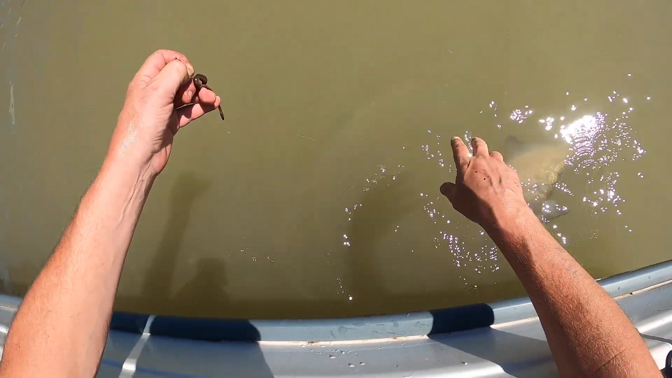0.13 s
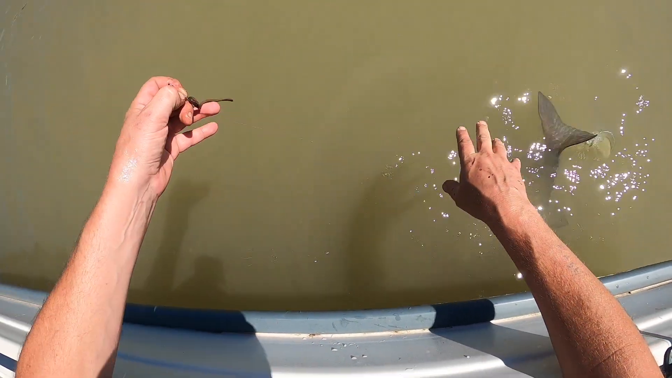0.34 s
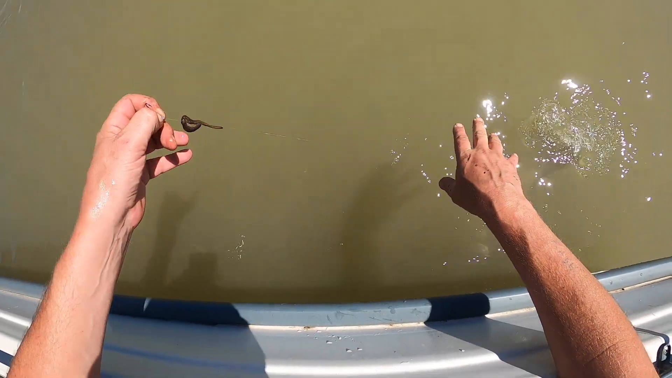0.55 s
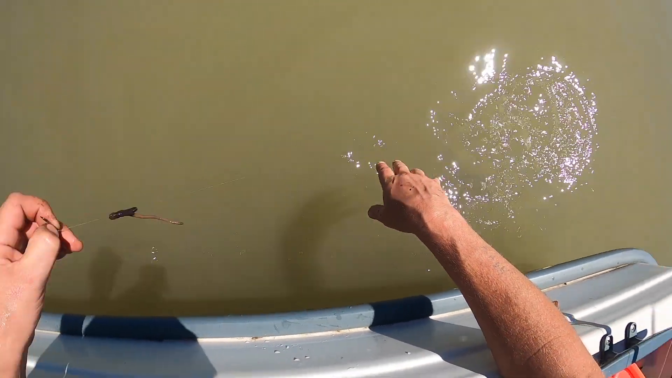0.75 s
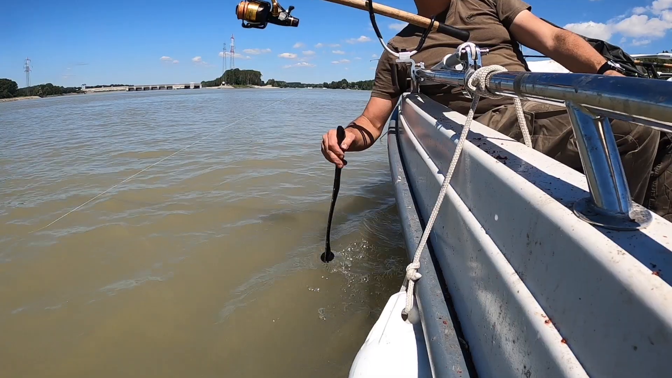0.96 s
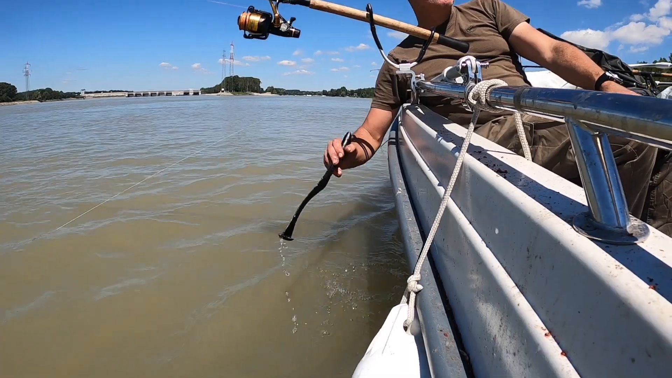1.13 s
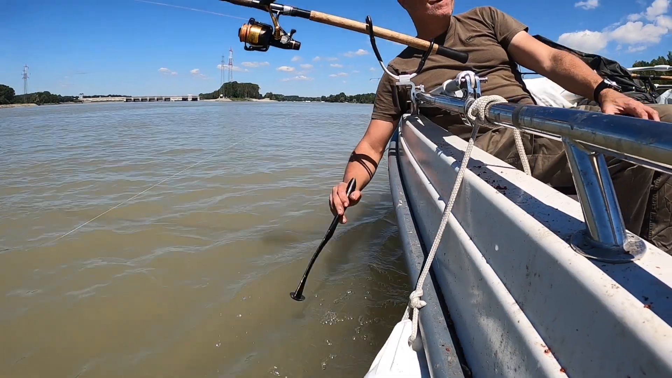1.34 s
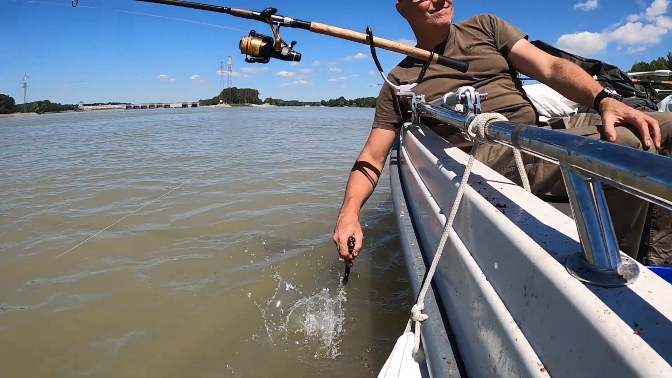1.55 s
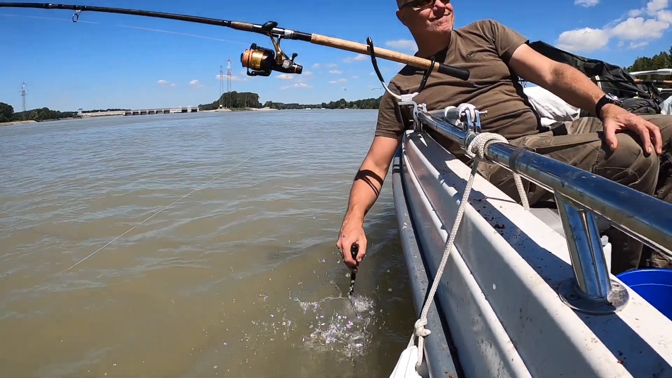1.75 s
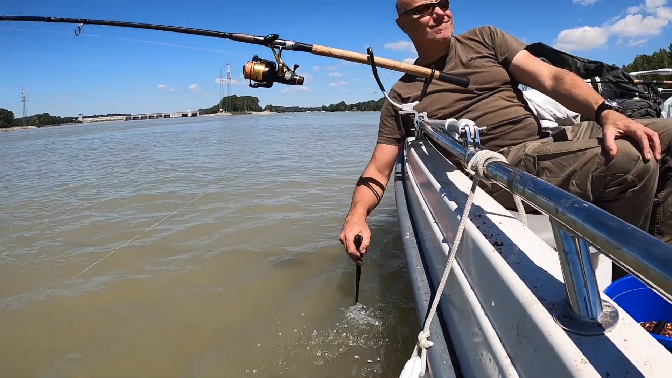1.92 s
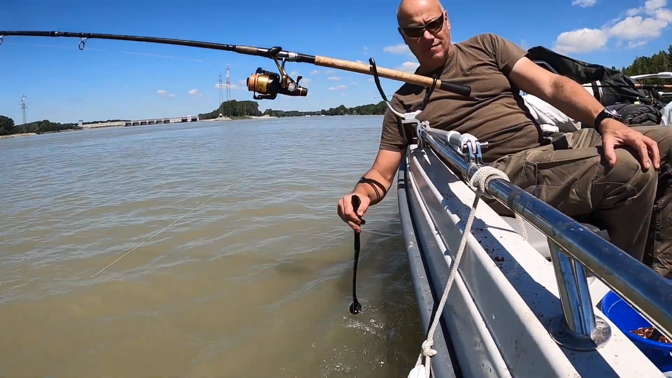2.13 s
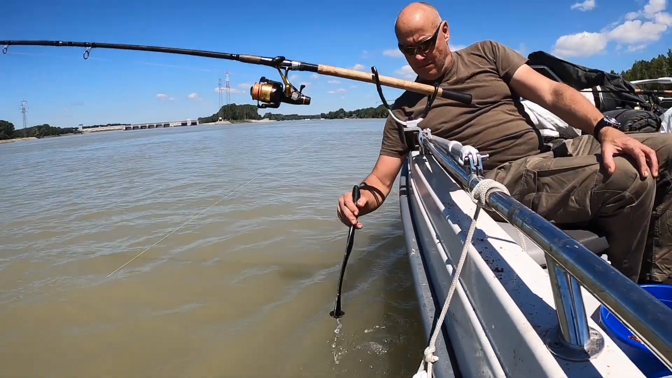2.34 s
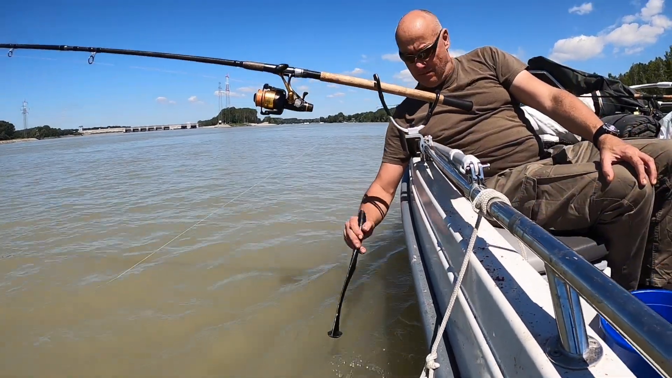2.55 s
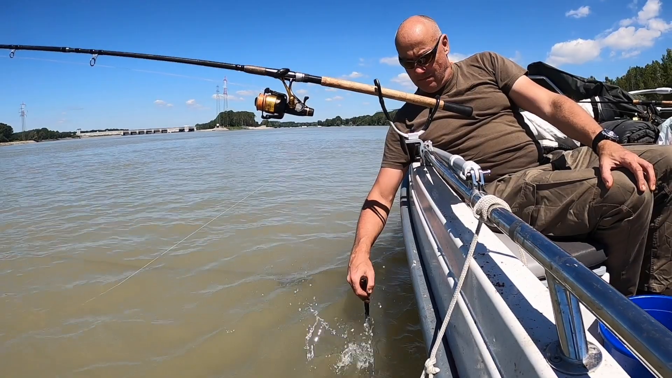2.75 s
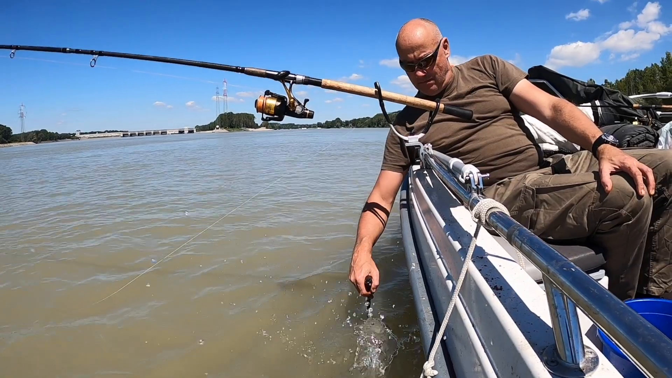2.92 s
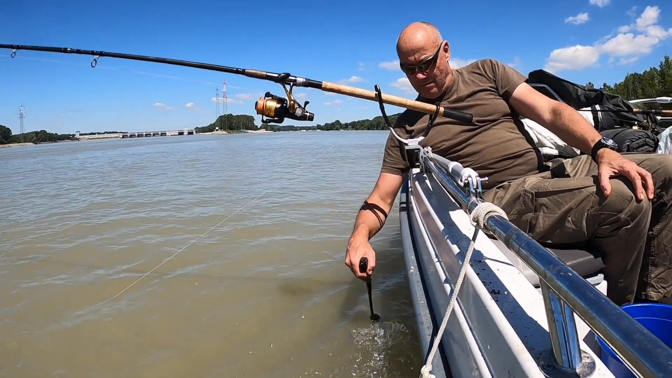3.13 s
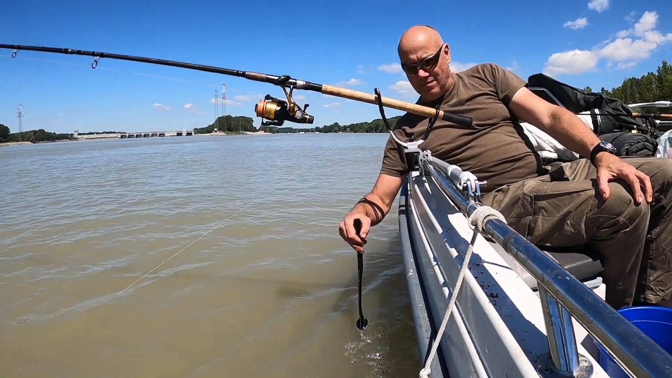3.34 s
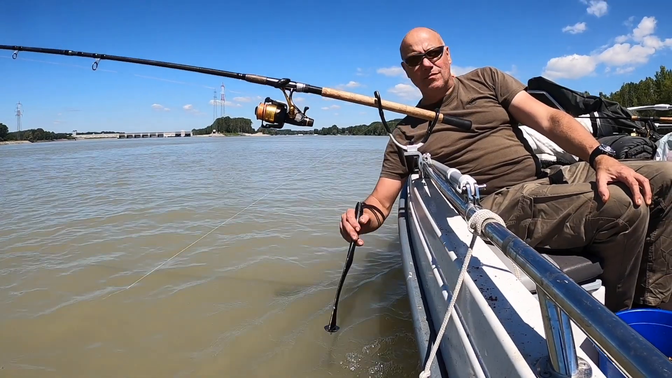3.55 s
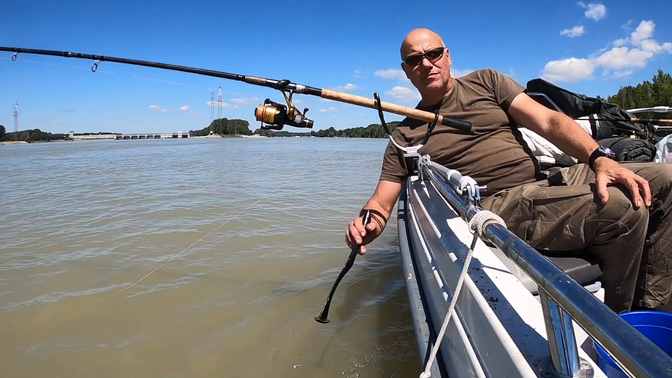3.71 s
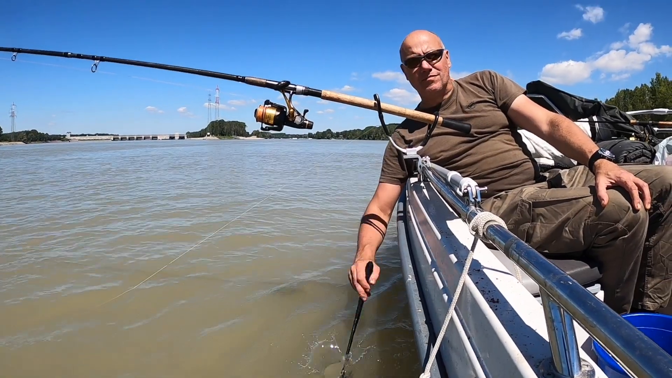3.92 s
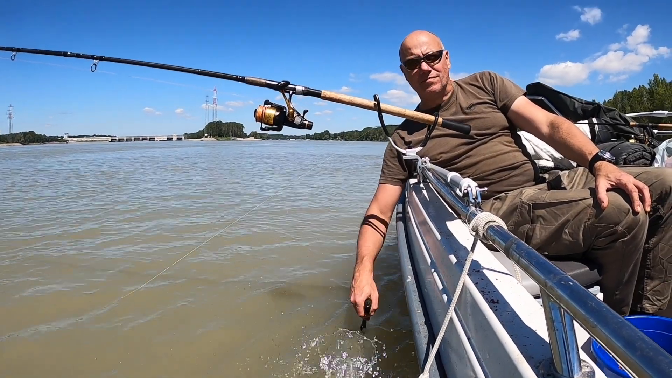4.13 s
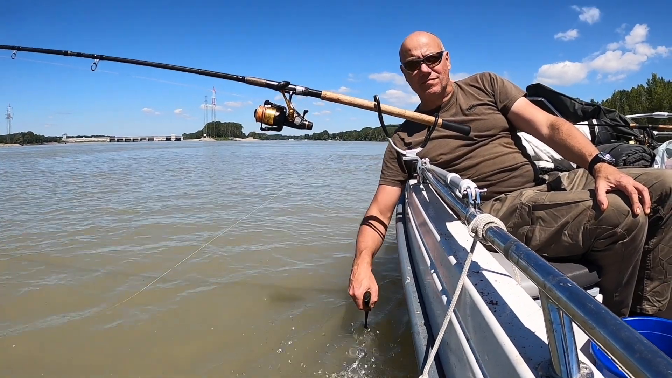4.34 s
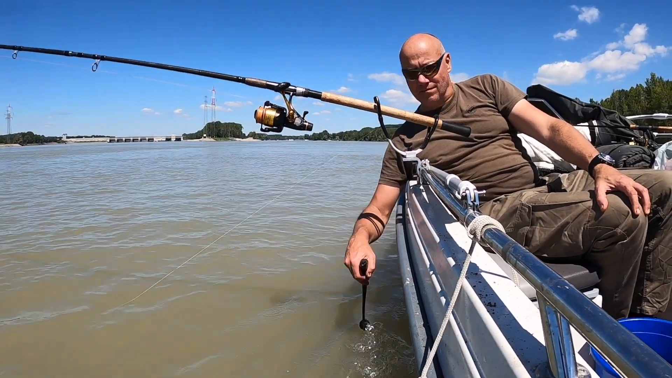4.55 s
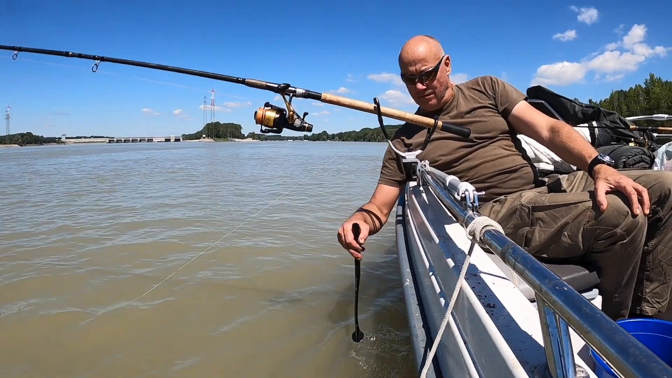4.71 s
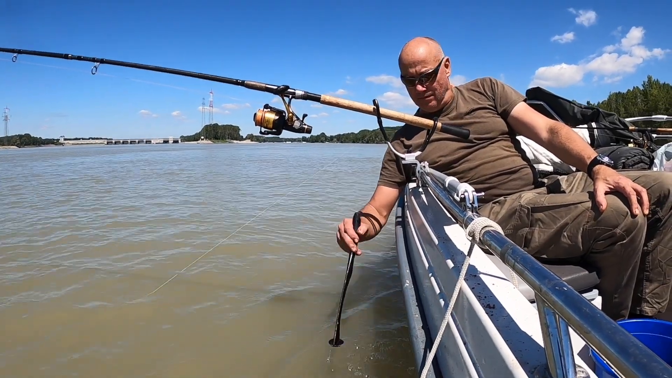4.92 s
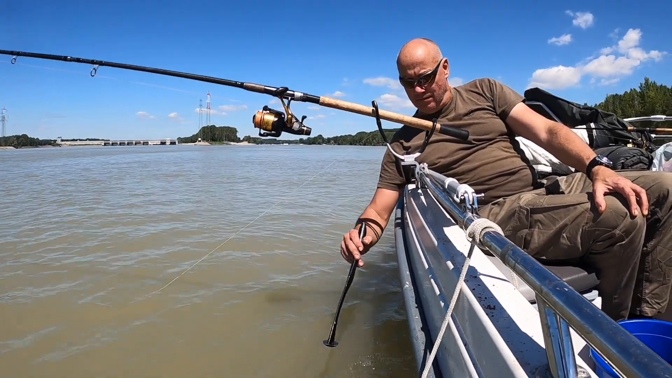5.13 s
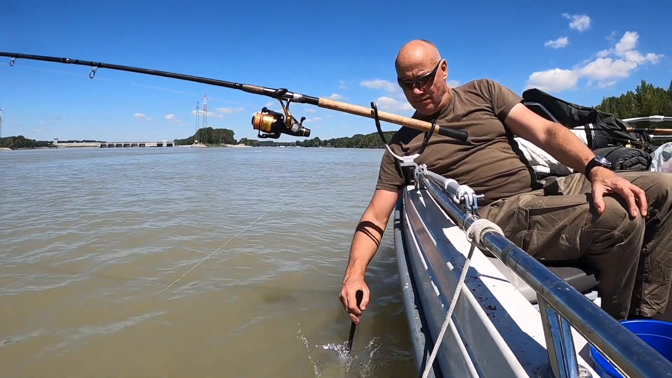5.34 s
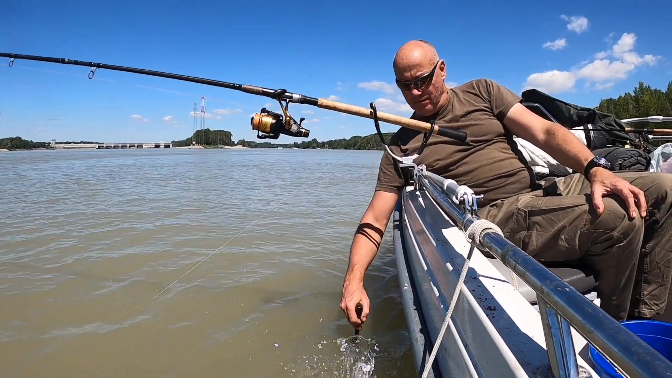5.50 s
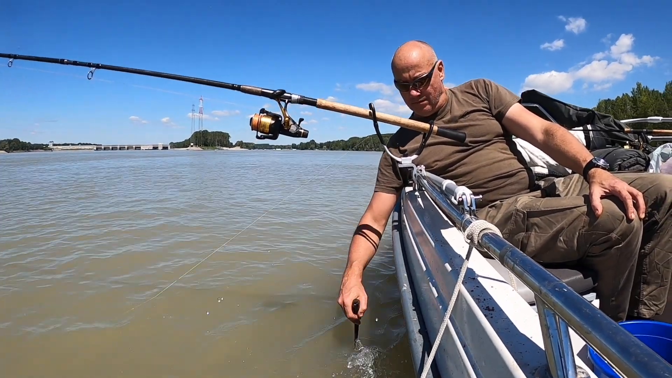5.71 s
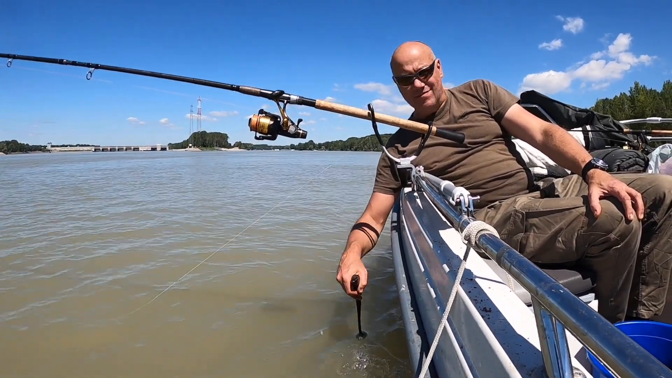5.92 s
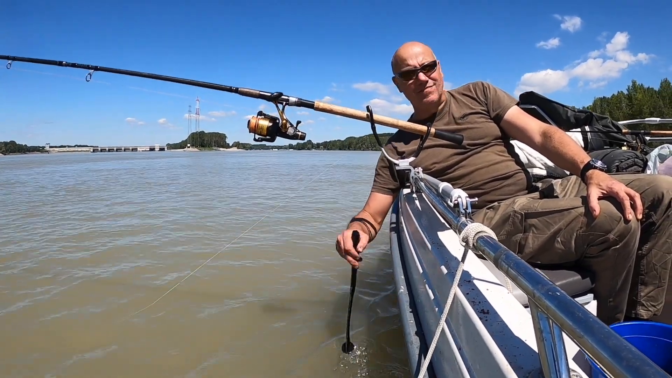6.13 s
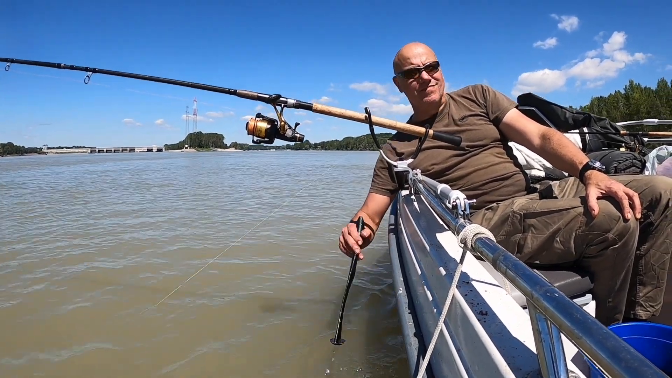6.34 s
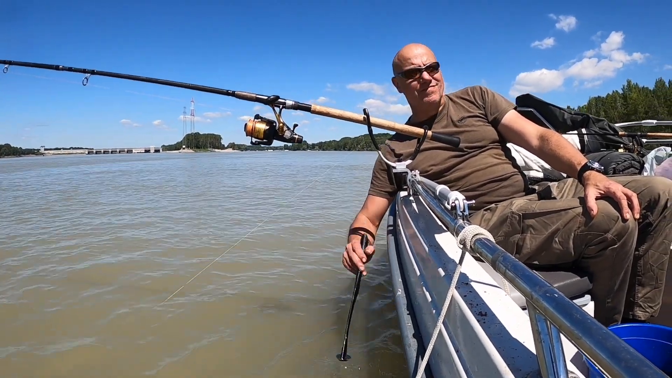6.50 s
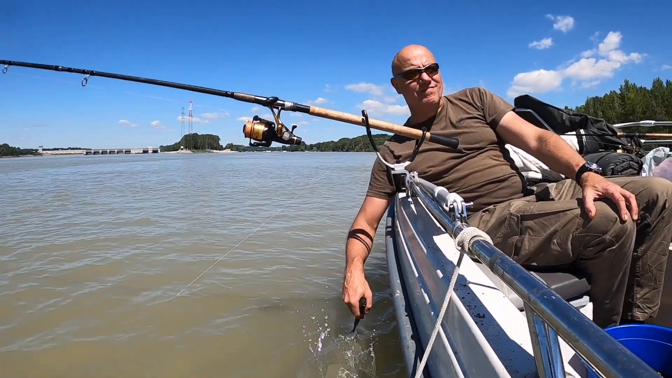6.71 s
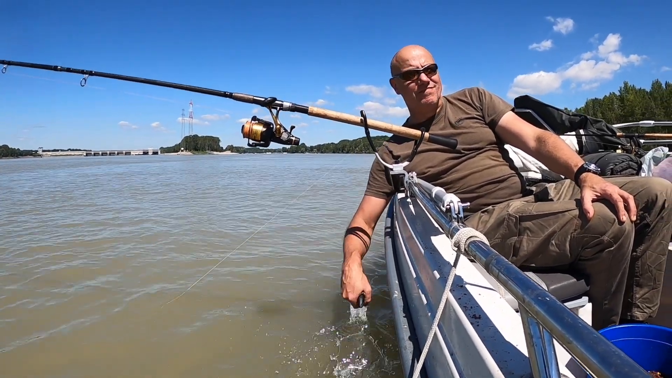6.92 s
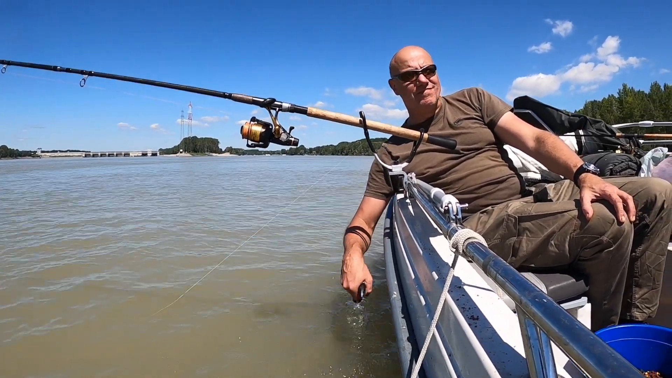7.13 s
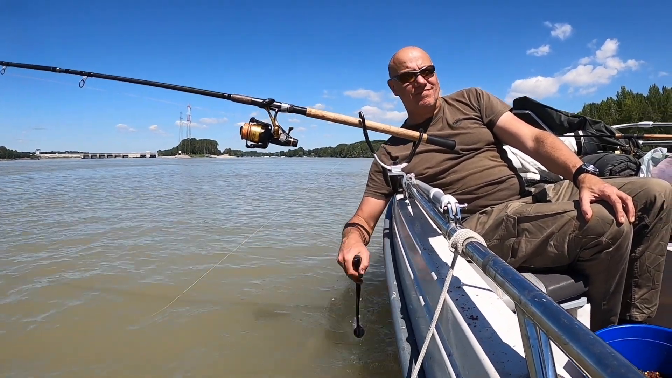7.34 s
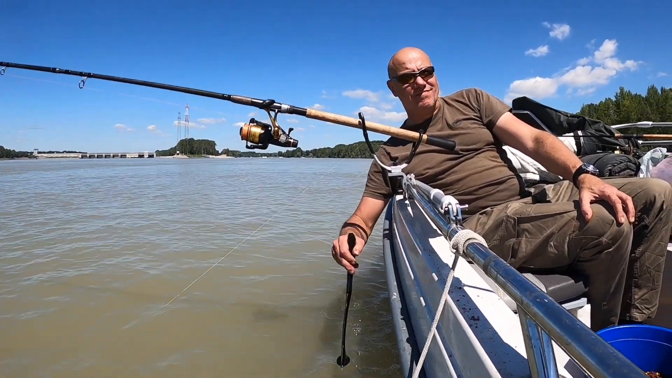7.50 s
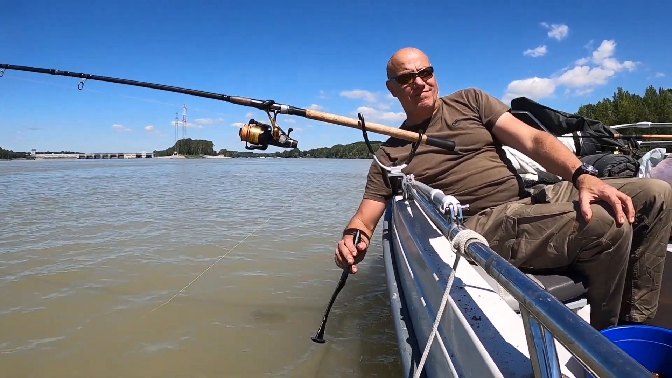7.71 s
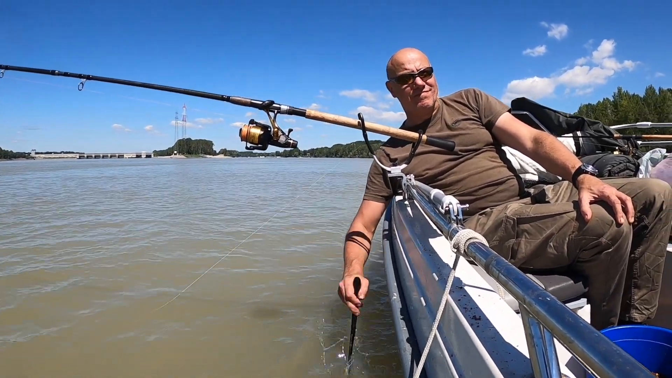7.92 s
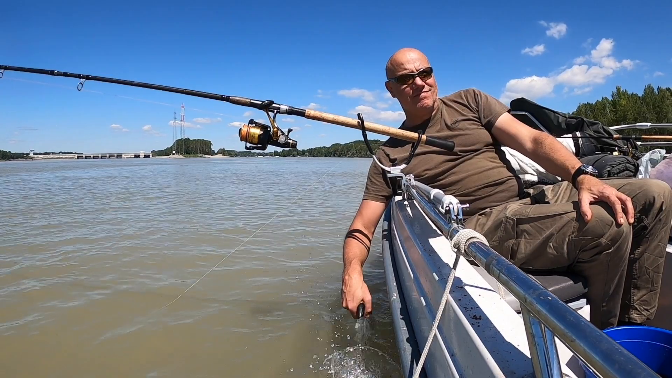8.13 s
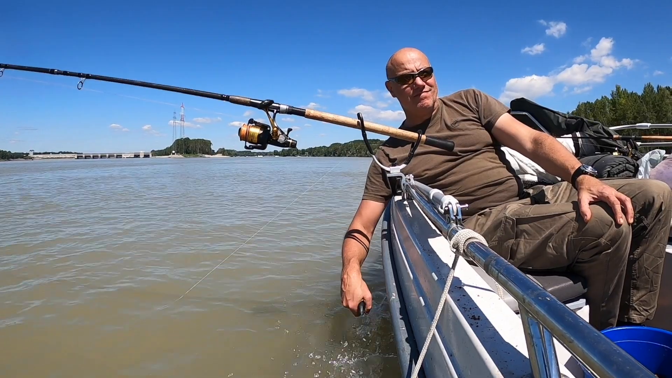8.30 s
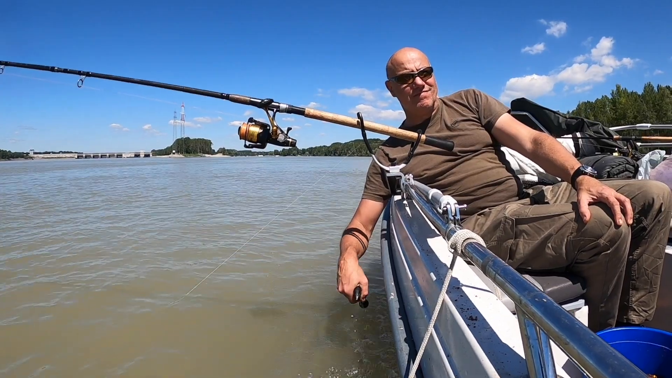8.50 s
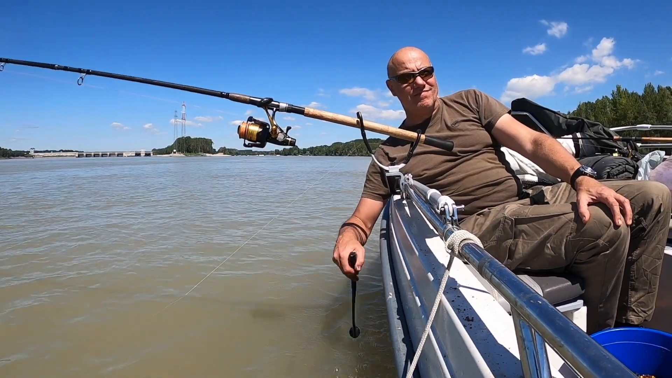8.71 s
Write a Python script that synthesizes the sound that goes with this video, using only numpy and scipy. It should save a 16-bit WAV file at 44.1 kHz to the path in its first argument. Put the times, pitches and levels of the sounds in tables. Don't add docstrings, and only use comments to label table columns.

```python
import sys
import numpy as np
from scipy import signal
from scipy.io import wavfile
from scipy.ndimage import uniform_filter1d

SR = 44100
rng = np.random.default_rng(int(sys.argv[2]) if len(sys.argv) > 2 else 0)


def attenuation_scalar(level_db):
    decades = np.asarray(level_db, float) / 20
    return 10 ** decades


def wav_record(signal):
    frames = np.transpose(np.atleast_2d(signal))
    bounded = np.clip(frames, -1, 1)
    quanta = np.round(bounded * 32767).astype(np.int16)
    wavfile.write(sys.argv[1], SR, quanta)


N = 390726
T = np.arange(N) / SR
SLOW = T[::64]
CHANGE_S = 1.0

# [t/s, peak level/dB, spray/dB, gurgle/dB, churn/s]
PINCHES = [
    (1.583, -11, -19, -27, 0.15),
    (2.8198, -9, -22, -28, 0.13),
    (4.1133, -8.5, -31, -25.5, 0.088),
    (5.469, -7, -20.5, -26, 0.12),
    (6.7975, -15, -19.5, -26, 0.12),
    (8.121, -14.5, -17, -24.5, 0.14),
]
# [f/Hz, level per Hz/dB]
FIZZ_SPECTRUM = [(880, -5.5), (1500, 4.5), (2200, -10.5), (2640, -2.5), (5830, -7.5), (7900, -8.5),
                 (15500, -31)]


def evened(x):
    return x / np.sqrt(np.mean(x ** 2) + 1e-20)


def coloured(x, points):
    f_hz, db = np.transpose(points)
    grid_hz = np.fft.rfftfreq(8192, 1 / SR)
    log_gain = np.interp(np.log(grid_hz + 1), np.log(f_hz), db) * np.log(10) / 20
    circle = np.r_[log_gain, log_gain[-2:0:-1]]
    taps = np.fft.ifft(np.exp(np.conj(signal.hilbert(circle)))).real[:4096]
    return signal.oaconvolve(x, taps / np.linalg.norm(taps))[:len(x)]


def noise_of(points):
    return coloured(rng.standard_normal(N), points)


def add(mix, s, sound):
    part = mix[round(s * SR):][:len(sound)]
    part += sound[:len(part)]


def lumps(seconds):
    size = max(int(seconds * SR), 1)
    return evened(uniform_filter1d(uniform_filter1d(rng.standard_normal(N), size), size))


def bump(peak_s, rise_s, fall_s):
    width_s = np.where(SLOW < peak_s, rise_s, fall_s)
    return np.exp(-((SLOW - peak_s) / width_s) ** 2 * 2)


def ring(hz0, hz1, seconds, rise=0.38):
    u = np.arange(int(3 * seconds * SR) + 8) / (seconds * SR)
    hz = hz0 + (hz1 - hz0) * np.minimum(u, 1.5)
    return np.sin(2 * np.pi * np.cumsum(hz) / SR) * (u / rise) * np.exp(1 - u / rise)


def swarm(per_s, lo_hz, hi_hz, cycles, spread_db, glide=1.09):
    out = np.zeros(N)
    for hz in np.geomspace(lo_hz, hi_hz, num=20):
        at, size = rng.random((2, 4000))
        used = np.arange(4000) < per_s / 20 * N / SR
        level = attenuation_scalar(-spread_db * np.log(size + 0.0024))
        train = np.bincount((at * N).astype(int), used * level, N)
        bubble = ring(hz, glide * hz, cycles / hz, rise=0.6)
        out += signal.oaconvolve(train, bubble)[:N] * np.sqrt(hz)
    return evened(out)


def shaft(start_s, top_hz, low_hz, loudest_s, db):
    sink_s, swell_db, hum_db = 0.0254, -13, -12.5
    fade_db_per_s, hum_fade_db_per_s = -600, -150
    pinch_s = min(row[0] for row in PINCHES if row[0] > start_s)
    t = np.arange(0, pinch_s - start_s, 1 / SR)
    pitch_hz = low_hz + (top_hz - low_hz) * np.exp(-t / sink_s)
    after_s = t - loudest_s
    before_db = swell_db * (1 - t / loudest_s)
    after_db = np.maximum(fade_db_per_s * after_s, hum_db + hum_fade_db_per_s * after_s)
    return start_s, t, pitch_hz, db + np.where(t < loudest_s, before_db, after_db)


def plop(broken, start_s, low_hz, db, dying_db_per_s, length_s, last_hz, sing_db, lateness, loudest):
    t = np.arange(0, length_s, 1 / SR)
    share = t / length_s
    squeeze = np.exp(-t / 0.0041)
    pitch_hz = low_hz * (1 + 0.97 * squeeze) * (last_hz / low_hz) ** (share ** lateness)
    ragged_db = length_s * broken[round(start_s * SR):][:len(t)]
    sing = attenuation_scalar(sing_db + ragged_db) * np.exp(-((share - loudest) / 0.21) ** 2)
    thump = attenuation_scalar(db + dying_db_per_s * t + 9.5 * squeeze)
    return start_s, t, pitch_hz, 20 * np.log10(thump + sing)


def holes():
    # [t/s, top f/Hz, bottom f/Hz, loudest after/s, level/dB]
    shaft_rows = [
        (1.504, 570, 355, 0.047, -13.5),
        (2.735, 974, 530, 0.0027, -43.5),
        (4.031, 756, 461, 0.0041, -27),
        (4.048, 522, 377, 0.026, -31),
        (5.388, 624, 400, 0.006, -30),
        (6.699, 697, 335, 0.0063, -22),
        (8.015, 665, 483, 0.009, -26.5),
        (8.07, 530, 246, 0.057, -25),
    ]
    # [t/s, lowest f/Hz, level/dB, decay/(dB/s)]
    plop_rows = [
        (1.587, 133.6, -14, -320),
        (2.824, 107.8, -16.5, -190),
        (4.115, 109.5, -17, -150),
        (5.472, 121.1, -13.5, -200),
        (6.8, 91.7, -17, -170),
        (8.124, 110, -21.5, -106),
    ]
    # [length/s, last f/Hz, level/dB, lateness of climb, loudest at share]
    refill_rows = [
        (0.15, 280, -52, 8.7, 0.89),
        (.33, 540, -41, 4.6, 0.79),
        (0.53, 820, -49.5, 2.5, 0.7),
        (0.3, 330, -44, 2.5, .88),
        (.128, 393, -23.5, 3.9, 0.7),
        (.162, 440, -22.5, 2.3, 0.12),
    ]
    shake = lumps(0.0036)
    broken_db = 3 * lumps(0.0062)
    notes = [shaft(*row) for row in shaft_rows]
    notes += [plop(broken_db, *pinched, *refill) for pinched, refill in zip(plop_rows, refill_rows)]
    out = np.zeros(N)
    for s, t, pitch_hz, db in notes:
        jolt = shake[round(s * SR):][:len(t)]
        turn = 2 * np.pi * np.cumsum(pitch_hz * (1 + 0.044 * jolt[::-1])) / SR
        edge = np.minimum(1, np.minimum(t, t[-1] - t) / 0.0042)
        note = np.sin(turn - 2.8) + attenuation_scalar(-22) * np.sin(2 * turn)
        level_db = db + 3.5 * jolt * np.minimum(pitch_hz / 500, 1) ** 2
        add(out, s, np.sqrt(2) * attenuation_scalar(level_db) * edge * note)
    return out


def cracks():
    # [f/Hz, level per Hz/dB]
    snap_spectrum = [(290, -22), (500, -17), (748, -12.5), (1620, -9), (4500, -12.5), (8120, -19),
                     (15500, -43)]
    out, t = np.zeros(N), np.arange(4000) / SR
    shape = np.minimum(t / 0.0024, 1) * (np.exp(-t / 0.0012) + 0.5 * np.exp(-t / 0.012))
    for s, db, *_ in PINCHES:
        add(out, s, attenuation_scalar(db - 9.0) * shape * rng.standard_normal(4000))
    return coloured(out, snap_spectrum)


def thrown():
    # [t/s, spray/dB, gurgle/dB]
    plunge_rows = [
        (1.486, -45, -40),
        (2.702, -51.5, -51),
        (4.0, -52.5, -55),
        (5.357, -49.5, -53),
        (6.67, -48, -54),
        (8.011, -45.5, -38.5),
    ]
    # [peak t/s, rise/s, fall/s, spray/dB, gurgle/dB]
    shower_rows = [(0.084, 0.03, 0.066, -55.5, -44.5), (0.429, 0.072, 0.059, -58, -46),
                   (1.039, 0.026, 0.22, -59, -56), (4.3, 0.14, 0.038, -55, -50.5),
                   (6.9, 0.012, 0.1, -48, -43), (0.559, 0.16, 0.062, -43, -49),
                   (0.628, 0.041, 0.048, -51.5, -55), (.76, 0.14, 0.042, -57.5, -71),
                   (1.87, 0.12, 0.23, -48, -49.5), (3.159, 0.23, 0.18, -52.5, -48.5),
                   (4.47, 0.11, 0.081, -45, -44.5), (5.79, 0.18, 0.2, -53.5, -55.5),
                   (7.02, 0.068, 0.25, -49.5, -49), (7.239, 0.21, 0.083, -46.5, -48),
                   (8.447, 0.16, 0.13, -42.5, -40.5)]
    fizz, gurgle = np.zeros(N), np.zeros(N)
    for (s, db, low_db), (pinch_s, _, burst_db, churn_db, churn_s) in zip(plunge_rows, PINCHES):
        plunge = np.clip((T - s) / 0.023, 0, 1) * (T < pinch_s)
        t = np.maximum(T - pinch_s, 0)
        rise = np.minimum(t / 0.0022, 1)
        burst = rise * (np.exp(-t / 0.0085) + attenuation_scalar(-19) * np.exp(-t / 0.058))
        churn = rise * np.exp(-2 * t / churn_s - (t / churn_s) ** 2)
        fizz += attenuation_scalar(db) * plunge + attenuation_scalar(burst_db) * burst
        gurgle += attenuation_scalar(low_db) * plunge + attenuation_scalar(churn_db) * churn
    for peak_s, rise_s, fall_s, db, low_db in shower_rows:
        shape = np.interp(T, SLOW, bump(peak_s, rise_s, fall_s))
        fizz += attenuation_scalar(db) * shape
        gurgle += attenuation_scalar(low_db) * shape
    return fizz, gurgle


def spray():
    fizz, gurgle = thrown()
    clumps = attenuation_scalar(3.76 * lumps(0.01))
    mist = swarm(4000, 1710, 16060, 2.4, 5.0) + 0.3 * rng.standard_normal(N)
    mist += 0.7 * swarm(800, 1900, 4305, 7.5, 3.9, 1.07)
    fine = evened(clumps * coloured(mist, FIZZ_SPECTRUM))
    coarse = swarm(900, 860, 1900, 6.5, 4.2, 1.13) + 0.5 * swarm(400, 320, 700, 6.3, 2.46)
    return attenuation_scalar(-0.5) * fizz * fine + attenuation_scalar(1.5) * gurgle * evened(np.sqrt(clumps) * coarse)


def bubbles():
    # [t/s,
    # level/dB, start f/Hz, end f/Hz, length/ms]
    glide_rows = [(0.423, -47, 850, 1130, 7), (0.561, -47, 1620, 1600, 5), (0.54, -50, 2600, 2900, 22),
                  (0.79, -72, 3380, 3180, 30), (0.296, -65, 4050, 3140, 25), (0.478, -44, 1127, 924, 18.5),
                  (0.505, -40.5, 790, 890, 8.9), (0.563, -27.5, 111, 55, 23), (0.584, -40.5, 550, 550, 17.5),
                  (8.203, -40, 2500, 2780, 6), (3.335, -62, 1000, 1450, 11), (3.397, -62, 1600, 1610, 9),
                  (1.85, -46.5, 380, 427, 11), (3.037, -51.5, 1070, 1390, 19), (4.032, -37, 1340, 864, 3.3),
                  (4.393, -44.5, 1145, 990, 7), (4.645, -59.5, 435, 1180, 45), (1.574, -43, 1700, 1740, 3),
                  (1.68, -44, 1000, 1230, 12), (0.334, -55.5, 626, 494, 14), (0.601, -55, 2850, 2680, 27),
                  (5.507, -32, 880, 960, 16), (5.556, -36, 895, 1030, 11.3), (5.679, -52.5, 880, 1150, 16),
                  (5.777, -36.5, 1810, 1490, 3.1), (5.83, -41, 1144, 1530, 9.7),
                  (6.834, -40, 588, 469, 28.3), (7.104, -40, 518, 418, 12.6), (8.084, -37, 633, 706, 13),
                  (8.122, -28, 1800, 1450, 7.9), (8.203, -29.5, 1370, 1710, 2), (8.398, -49, 340, 562, 38),
                  (7.053, -49, 263, 478, 54),
                  (0.567, -51, 1610.0, 1740, 4.0), (0.61, -41.5, 1000, 740, 4.9),
                  (1.494, -42.2, 1390, 1220, 12.6), (1.514, -31.5, 1030, 830, 22),
                  (1.641, -46, 1310.0, 1340.0, 8.1), (1.979, -44.5, 1920.0, 1990, 3.4),
                  (2.743, -51, 564, 590, 9.9), (2.836, -34, 1320, 1393, 6.9), (2.845, -31, 990, 1080, 1.2),
                  (3.087, -45, 1920, 1830, 0.97), (4.075, -45.0, 1570, 1360, 6.8),
                  (4.173, -33.5, 1004, 970.0, 5.1), (4.281, -55, 1180.0, 1160.0, 8.4),
                  (4.432, -45, 1830.0, 1640.0, 1.2), (4.462, -43.5, 1010.0, 1100.0, 4.0),
                  (4.462, -43.9, 1350, 1460.0, 2.2), (4.519, -51, 560.0, 585, 13),
                  (5.392, -43.5, 1040, 960, 4.0), (5.472, -29.5, 1067, 1020, 1.9),
                  (6.707, -30.8, 632, 517, 4.3), (6.822, -41, 2000.0, 1810.0, 7.6),
                  (6.827, -39, 2190, 2290, 2.2), (6.898, -43.5, 2480, 2320, 4.5),
                  (6.911, -45, 1280, 1330, 7.6), (6.979, -52.5, 930.0, 1030.0, 10),
                  (6.979, -45, 603, 660, 8.1), (7.033, -49, 1940.0, 1960.0, 2.2),
                  (7.141, -47.5, 1390, 1470, 15), (7.185, -50, 1270.0, 1080.0, 5.9),
                  (7.221, -47, 2080, 2000.0, 2.5), (7.262, -43, 2370.0, 2350, 1.9),
                  (8.065, -39, 1290.0, 1270, 13.7), (8.085, -38, 1134, 970.0, 17),
                  (8.133, -48, 2150, 2370, 17.8), (8.15, -30, 1570.0, 1610.0, 2.2),
                  (8.16, -38, 1080.0, 950.0, 6.2), (8.197, -42, 960, 1243, 15),
                  (8.528, -49, 1810.0, 1850.0, 2.2), (8.536, -54, 1010.0, 1080, 7.4)]
    # [t/s, level/dB, f/Hz, length/ms]
    steady_rows = [(0.437, -42, 1090, 17), (0.641, -48.5, 877, 13), (1.031, -46, 1005, 3),
                   (1.587, -25.5, 1250, 1.1), (1.661, -30, 990, 5.0), (1.862, -40.5, 1500, 2.9),
                   (1.98, -48, 1016, 5.3), (2.069, -42, 1660, 2.3), (2.262, -60, 704, 15),
                   (2.775, -37.5, 1470, 2.2), (2.836, -39.5, 1390, 21), (2.865, -38, 1450, 2.6),
                   (2.981, -38.5, 1637, 3.4), (3.085, -42, 1910, 1.7), (3.195, -40.5, 1720, 2.3),
                   (4.187, -29, 1030, 3.0), (4.215, -38, 1000, 3.1), (4.446, -41.5, 1410, 5.1),
                   (4.503, -44.5, 1510, 4.0), (5.503, -37, 1560, 7), (5.584, -39.5, 1130, 4.0),
                   (5.894, -54.5, 1545, 18), (6.091, -54.5, 1550, 9.8), (6.749, -33.5, 1350, 2.1),
                   (6.809, -40, 1414, 31), (6.841, -29.5, 1490, 1.7), (6.899, -32, 1390, 0.63),
                   (7.103, -41.5, 1516, 4.8), (8.06, -40.5, 970, 12), (8.281, -45.5, 1070, 8.2),
                   (0.084, -43.5, 1570, 1.3), (0.442, -52, 1650, 1.2), (0.585, -37, 970.0, 1.4),
                (1.587, -26.2, 830, 1.2), (2.896, -40, 880.0, 1.3), (4.118, -39, 2020, 1),
                (4.118, -31, 1500, 1.3), (4.29, -45.6, 1580, 1.2), (4.313, -43.5, 1590.0, 1.2),
                (4.469, -39, 2300, 1.2), (4.604, -48, 2250, 1.2), (5.412, -43.0, 990.0, 1.2),
                (5.494, -31, 1530.0, 1.2), (5.682, -47, 1640, 1.3), (6.703, -44.5, 1460, 1.1),
                (6.805, -27, 1040, 1.2), (6.829, -25, 1420.0, 1.1), (8.021, -43, 1360.0, 1.2),
                (8.185, -31, 1340.0, 1.2), (8.367, -45, 1110, 1.2), (8.414, -38.0, 1420.0, 1.2),
                (8.463, -35.5, 1390, 1.1), (8.552, -47, 1000, 1.4)]
    rows = glide_rows
    rows = rows + [(s, db, hz, 1.02 * hz, ms) for s, db, hz, ms in steady_rows]
    out = np.zeros(N)
    for s, db, hz0, hz1, ms in rows:
        add(out, s - 0.002, attenuation_scalar(db + 11.0) * ring(hz0, hz1, (ms + 1.6) / 1000))
    return out * attenuation_scalar(4.01 * lumps(0.0024))


def drops(rows, tick_db, ring_db, ring_s):
    tick, ping, t = np.zeros(N), np.zeros(N), np.arange(900) / SR
    shape = np.minimum(t / 0.0007, 1) * (np.exp(-t / 0.0016) + 0.08 * np.exp(-t / 0.0082))
    for s, db, hz in rows:
        add(tick, s, attenuation_scalar(db + tick_db) * rng.standard_normal(900) * shape)
        add(ping, s, attenuation_scalar(db + ring_db) * ring(hz, 1.006 * hz, ring_s, rise=0.32))
    return coloured(tick, FIZZ_SPECTRUM) + ping


def droplets():
    # [t/s, peak level/dB, f/Hz]
    splash_rows = [(0.082, -36, 4200), (0.539, -25, 5760), (0.582, -23.5, 6140), (1.627, -25, 5460),
                   (2.7, -27.5, 3280), (2.759, -31.5, 4320), (2.841, -20, 3120), (3.999, -24, 3700),
                   (4.033, -29.5, 3700), (5.352, -25.5, 7340), (5.428, -30.5, 4660), (5.502, -19.5, 3130),
                   (6.748, -34.5, 6000), (6.82, -13.5, 3140), (6.891, -30, 2500), (6.899, -36, 2250),
                   (7.99, -11, 3290), (8.014, -19, 3170),
                   (0.739, -35, 5030), (1.344, -40, 3860), (1.927, -26.5, 2860), (1.979, -30, 2400),
                 (2.005, -33.5, 5300), (2.058, -29.5, 3460), (2.351, -37, 2630), (2.371, -40, 5840),
                 (2.431, -49, 4200), (2.523, -43, 2820), (3.006, -35.5, 3580), (3.042, -29.5, 3130),
                 (3.264, -26, 3140), (3.286, -34.5, 3500), (3.313, -34.5, 4640), (3.362, -42, 5200),
                 (3.473, -44, 3130), (4.601, -39.5, 2320), (5.721, -36.5, 3900), (5.75, -27.5, 4700),
                 (5.765, -30.5, 3100), (5.785, -31, 4230), (6.189, -39.5, 1860), (6.514, -39.5, 3200),
                 (7.117, -29, 4610), (7.319, -28.5, 3830), (8.539, -32, 2920), (8.81, -39, 3160),
                   (0.417, -36, 2400), (4.498, -32, 4100), (0.475, -30, 2180), (0.607, -27, 2800),
                   (1.466, -33.5, 5000), (1.7995, -35, 3400), (1.8794, -28, 3220), (1.899, -32, 3900),
                   (2.9535, -43, 2930), (3.1183, -26, 2160), (3.1396, -42, 2030), (4.2033, -30.5, 2890),
                   (4.2538, -33, 2090), (4.2994, -52, 2940), (4.3216, -36.5, 2940), (4.4275, -34, 3150),
                   (4.4882, -31, 2430), (5.512, -22, 3180), (5.5456, -31, 2220), (5.5667, -36, 3100),
                   (8.1782, -30, 2680), (8.3534, -31, 3210), (8.4838, -36, 2560),
                   (1.086, -46, 8420.0), (1.243, -51, 6910.0), (1.502, -33, 7540), (1.728, -42, 8140),
                  (1.785, -54, 8250.0), (1.961, -52, 8030.0), (1.992, -45.4, 7300.0), (2.057, -36.5, 8200),
                  (2.087, -46.5, 7820.0), (2.47, -57, 5580.0), (2.661, -51.0, 6070.0), (2.702, -35, 8250),
                  (2.902, -40, 8230.0), (3.106, -37.5, 7800.0), (4.351, -55, 7640.0), (4.934, -55, 6420.0),
                  (5.221, -57, 6420.0), (5.253, -53, 5400.0), (5.353, -25, 8640), (5.384, -21.5, 3490.0),
                  (5.449, -47, 8660.0), (5.664, -48, 6750), (6.128, -55, 7600.0), (6.387, -56.5, 7820.0),
                  (6.559, -41.5, 4950.0), (6.61, -45.1, 6300), (6.666, -18, 3920), (7.302, -40, 8700),
                  (7.341, -55, 6850.0), (8.363, -40, 8300)]
    # [t/s, peak level/dB, f/Hz]
    drip_rows = [(0.3785, -40, 2330), (0.4374, -47, 2920), (0.7682, -44, 2580), (5.958, -48, 3000),
                 (1.1594, -54, 1820), (2.0577, -45, 1770), (2.5585, -51.5, 4150), (2.6184, -55, 4990),
                 (2.9093, -38, 3020), (4.5486, -38, 2340), (4.566, -38, 2310), (6.088, -54, 2500),
                 (6.2585, -52, 3060), (7.382, -39.5, 2110), (4.503, -42, 3350), (8.5704, -42, 2970)]
    sharp = drops(splash_rows, -8.5, -3.5, ring_s=0.0015)
    return sharp + drops(drip_rows, -9, -2.0, ring_s=0.0045)


def hull(x):
    t = np.arange(4000) / SR
    sparse = rng.choice([-1., 1.], 4000) * (rng.random(4000) < 0.05)
    taps = sparse * attenuation_scalar(-60 * t / 0.035) * (t > 0.0015)
    return signal.oaconvolve(x, taps / np.linalg.norm(taps))[:N]


def knocks():
    # [t/s, level/dB]
    knock_rows = [
        (0.084, -33.5),
        (0.329, -42),
        (0.386, -32.5),
        (0.518, -35),
    ]
    # [f/Hz, level/dB, t60/s]
    modes = [(138.4, -1.5, 0.28), (252, -0.5, 0.4), (456, -9, 0.23), (748, -6.5, 0.13)]
    out, t = np.zeros(N), np.arange(SR // 2) / SR
    body = sum(attenuation_scalar(db - 60 * t / t60_s) * np.sin(2 * np.pi * hz * t) for hz, db, t60_s in modes)
    for s, db in knock_rows:
        add(out, s, attenuation_scalar(db) * np.minimum(t / 0.0075, 1) * body)
    return out


def wind():
    # [t/s, buffet/dB]
    breeze_points = [(0, -46), (.7, -41), (.92, -46), (.985, -73), (1.01, -31), (1.7, -49.5), (2.4, -41),
                     (3.05, -48.5), (3.9, -53.5), (4.3, -44), (4.9, -49.5), (5.9, -38), (6.06, -52),
                     (6.6, -41), (7.1, -44), (7.8, -40), (8.86, -37)]
    # [peak t/s, buffet/dB, half length/s]
    gust_rows = [(0.41, -36.5, 0.12), (0.598, -27, 0.072), (0.837, -28.5, 0.053), (0.757, -34, 0.018),
                 (1.059, -32, 0.027), (3.24, -41, 0.06), (4.993, -42, 0.052), (6.197, -39, 0.065),
                 (7.249, -26.5, 0.024), (7.34, -31.5, 0.058), (6.68, -47, 0.092), (8.365, -29, 0.018),
                 (7.449, -30, 0.054), (8.46, -44.5, 0.2), (8.725, -32, 0.068)]
    # [f/Hz, level per Hz/dB]
    buffet_spectrum = [(15, -6.5), (30, 2), (70, -2), (150, -14.5), (300, -45), (900, -83)]
    # [f/Hz, level per Hz/dB]
    flutter_spectrum = [(40, -12.5), (90, 2), (250, -5.5), (500, -41), (1200, -69)]
    force = attenuation_scalar(np.interp(SLOW, *np.transpose(breeze_points)))
    for s, top_db, half_s in gust_rows:
        force = force + attenuation_scalar(top_db) * bump(s, half_s, half_s)
    db = np.interp(T, SLOW, 20 * np.log10(force))
    lumpy = attenuation_scalar(3.56 * lumps(0.045))
    buffet = evened(noise_of(buffet_spectrum) * lumpy) * attenuation_scalar(db - 1.9)
    flutter_db = 1.15 * (db + 34.5) - 56.5 + 16.2 * (T < CHANGE_S)
    return buffet + evened(noise_of(flutter_spectrum) * lumpy) * attenuation_scalar(flutter_db)


def river():
    # [f/Hz, level per Hz/dB]
    water_spectrum = [(59, -40.5), (100, 2), (313, -4.5), (399, -12), (433, -9), (707, -25.5),
                      (1080, -24.5), (2260, -29.5), (2940, -28.5), (4990, -36.5), (13800, -56)]
    # [f/Hz, level per Hz/dB]
    bank_spectrum = [(400, -2.5), (750, -0.5), (1500, -3), (1900, -14), (2300, -4.5), (3300, -11),
                     (4800, -7.5), (11000, -43)]
    # [t/s, level over river/dB]
    lift_points = [(0, 5.5), (.12, -0.5), (.3, -3.5), (.7, -12), (.9, -11.5), (.999, -29), (1.0, 5),
                   (1.12, -2.5), (1.3, -2.2)]
    lift_db = np.interp(T, *np.transpose(lift_points)) + lumps(0.0074)
    bank = (T < CHANGE_S) * attenuation_scalar(-5.0) * noise_of(bank_spectrum)
    water = evened(noise_of(sorted(water_spectrum + [(15200, -90)])))
    return attenuation_scalar(-49.5 + lift_db) * (water + bank)


def ripples():
    return attenuation_scalar(-76) * swarm(60, 953, 1867, 13.0, 0.83) + attenuation_scalar(-81.0) * swarm(90, 3500, 8030, 5.5, 0.85)


def hum():
    # [f/Hz, level/dB]
    lines = [(436.0, -65), (500.6, -73.5)]
    out = np.zeros(N)
    for hz, db in lines:
        level = attenuation_scalar(db + 2 + 0.83 * lumps(0.08))
        out += level * np.sin(2 * np.pi * np.cumsum(hz + 3.97 * lumps(0.062)) / SR)
    return out


def scene():
    # [t/s, side of scene/dB, side of wind/dB]
    width_points = [(0, -58, -83), (3.4, -48, -45), (3.9, -20, -21), (5, -10.5, -12), (6.5, -6.5, -6.5),
                    (8.86, -4.5, -4)]
    second_place = T > CHANGE_S
    deep = holes() + knocks()
    bright = bubbles() + cracks() + droplets() + spray() + ripples() * second_place
    gust = wind()
    mid = deep + bright + attenuation_scalar(-10.0) * hull(bright) + river() + gust + hum() * second_place

    s, scene_db, wind_db = np.transpose(width_points)
    late = -1.16 * np.gradient(uniform_filter1d(bright, size=2))
    spread = 0.32 * deep + 0.2 * bright + 0.4 * hull(bright) + late + river()
    side = attenuation_scalar(np.interp(T, s, scene_db)) * spread
    side += attenuation_scalar(np.interp(T, s, wind_db) + 0.5) * (gust + 0.76 * wind())
    highpass = signal.firwin(255, 11400, pass_zero=False, fs=SR)
    airy = signal.oaconvolve(mid, highpass, "same")
    side += attenuation_scalar(2.5) * airy * lumps(0.0015)
    return np.array([mid + side, mid - side])


def top_cut(x):
    return signal.sosfilt(signal.butter(12, 16510, fs=SR, output="sos"), x)


def record(dry):
    step = -0.025 * (T > CHANGE_S) * np.exp(-np.maximum(T - CHANGE_S, 0) / 0.014)
    lowpass = signal.firwin(127, 15700, fs=SR)
    return top_cut(signal.oaconvolve(np.tanh(dry + step), lowpass[None], "same"))


dry = scene()
out = record(dry)
wav_record(out)
```